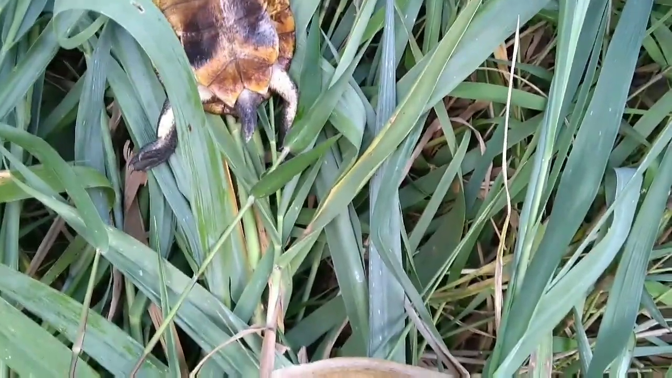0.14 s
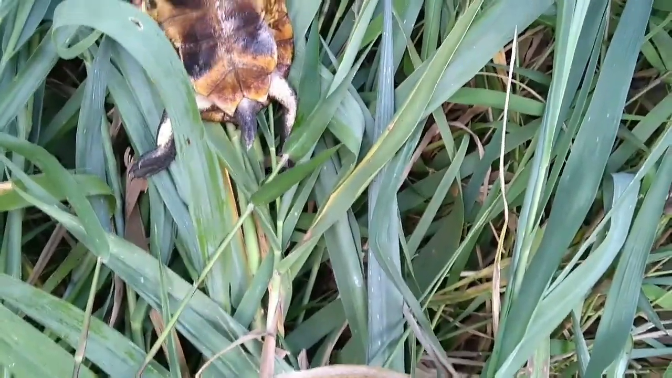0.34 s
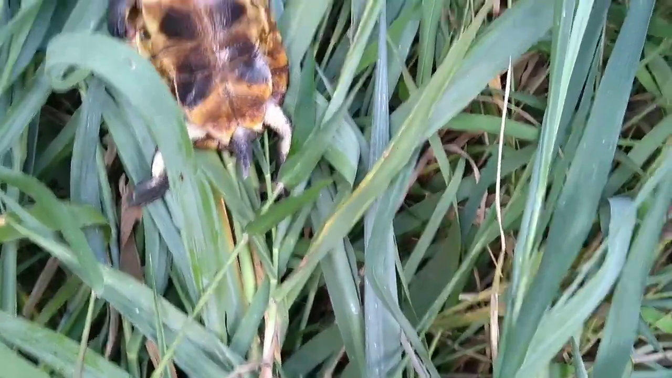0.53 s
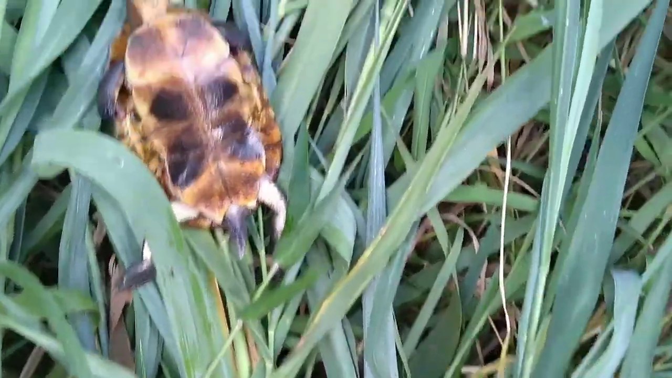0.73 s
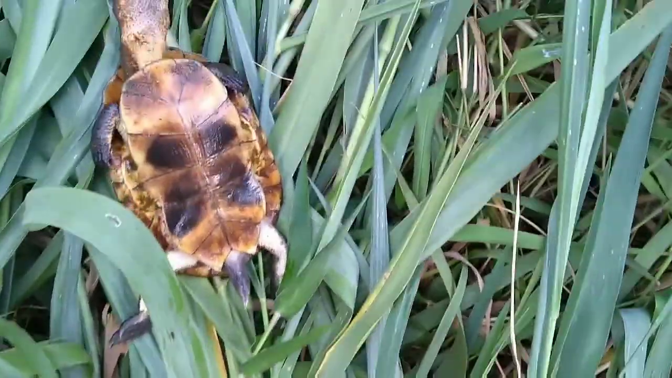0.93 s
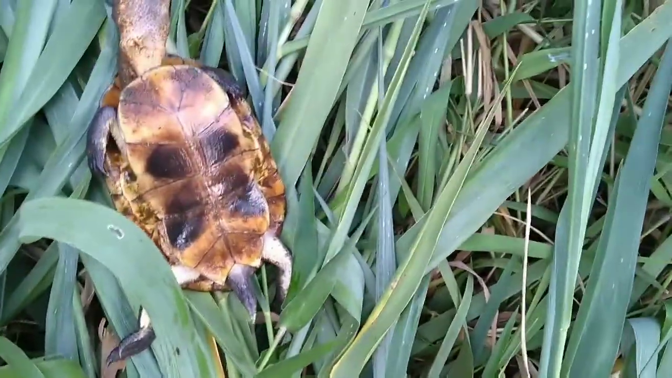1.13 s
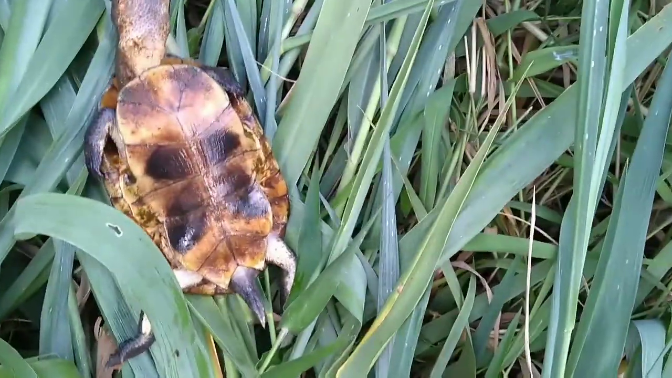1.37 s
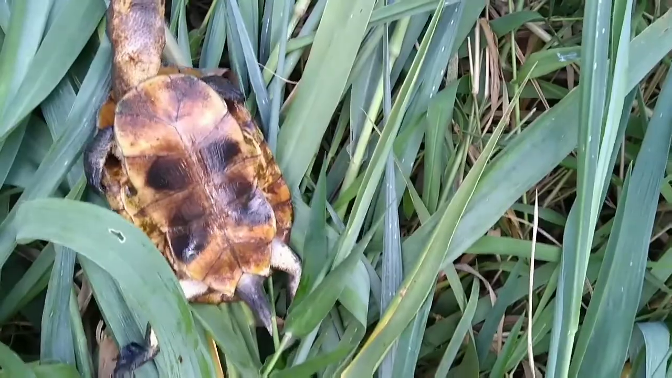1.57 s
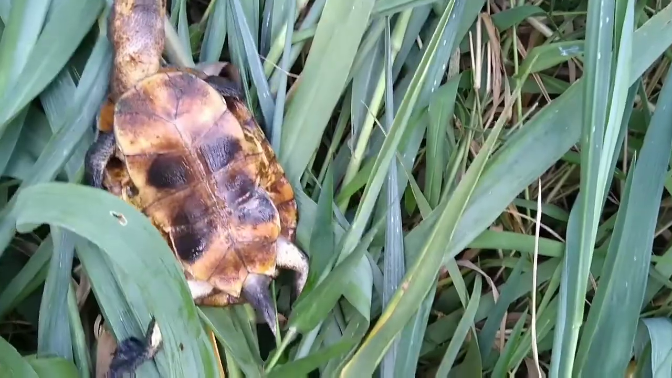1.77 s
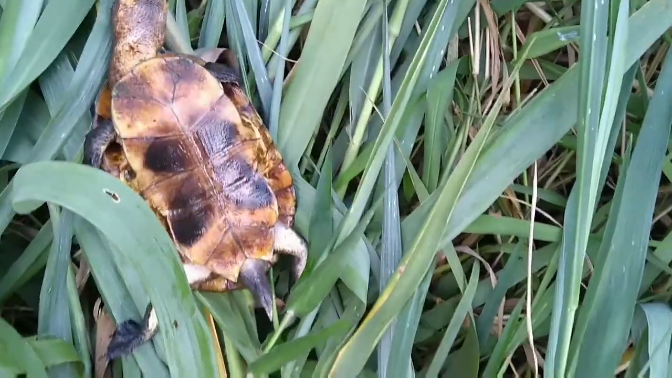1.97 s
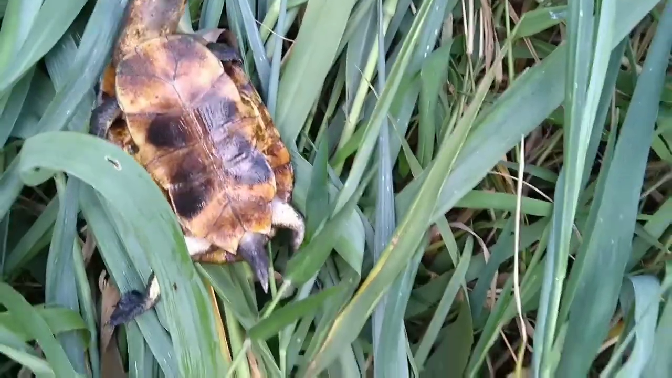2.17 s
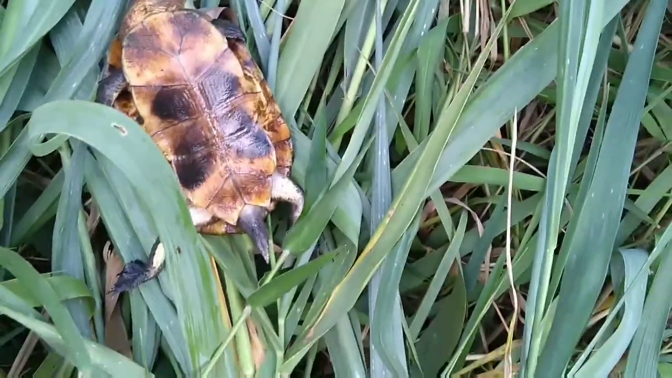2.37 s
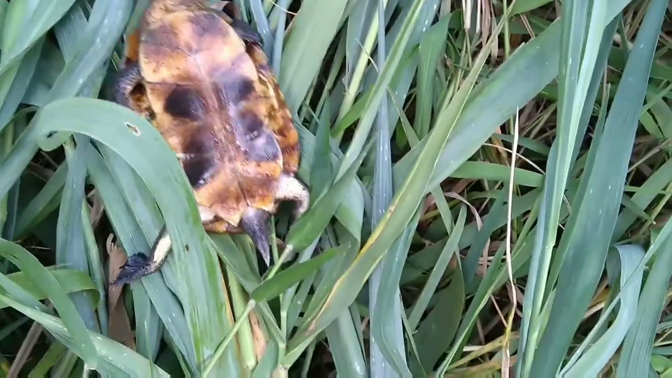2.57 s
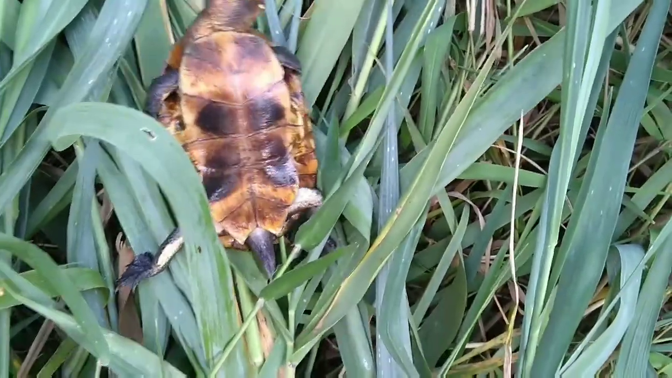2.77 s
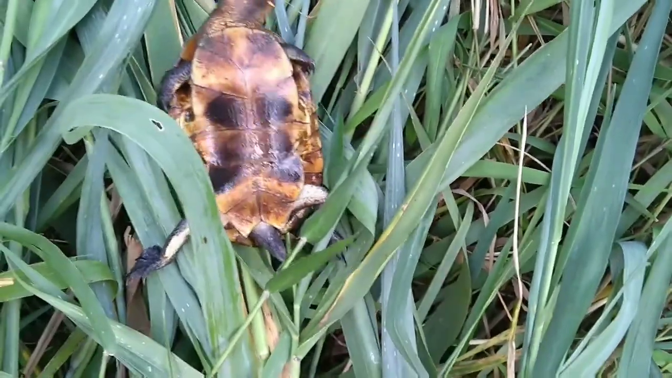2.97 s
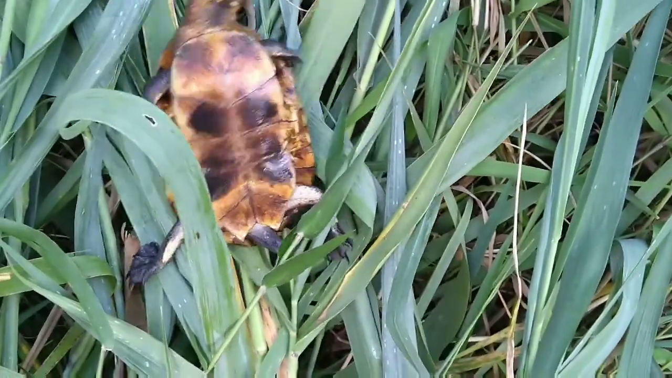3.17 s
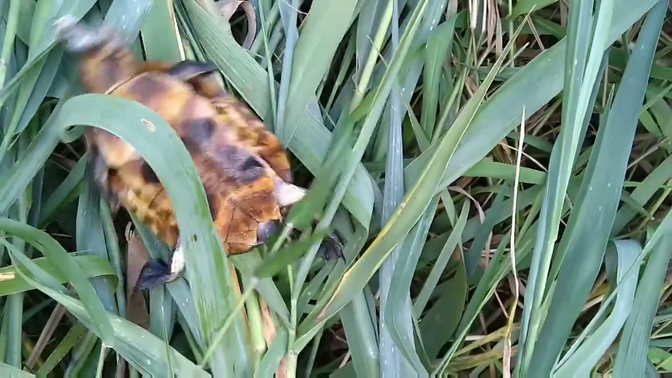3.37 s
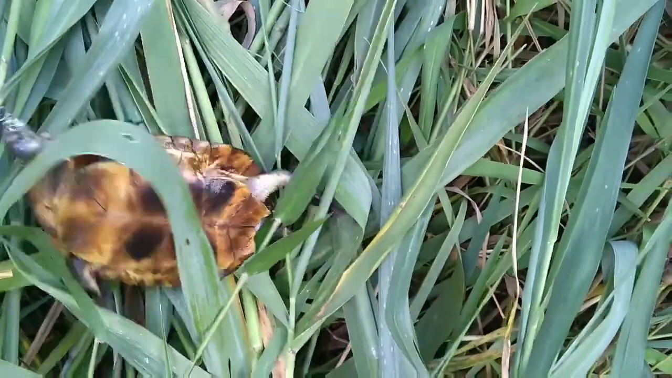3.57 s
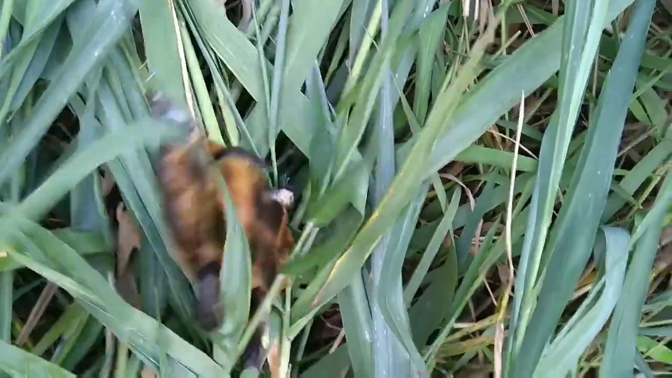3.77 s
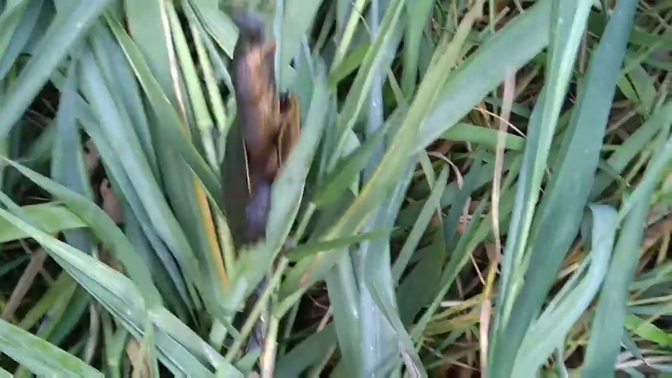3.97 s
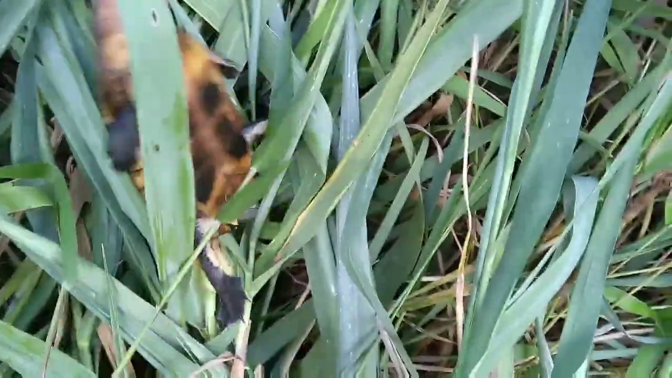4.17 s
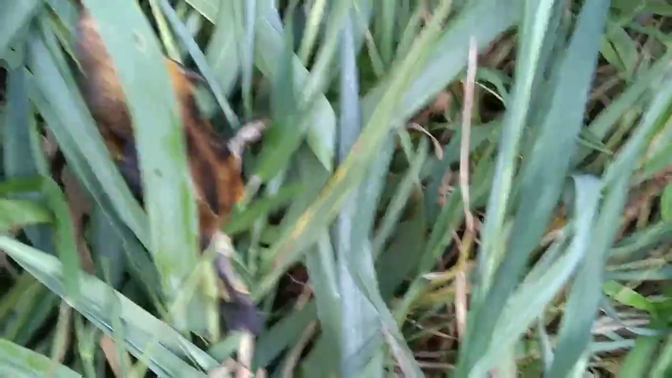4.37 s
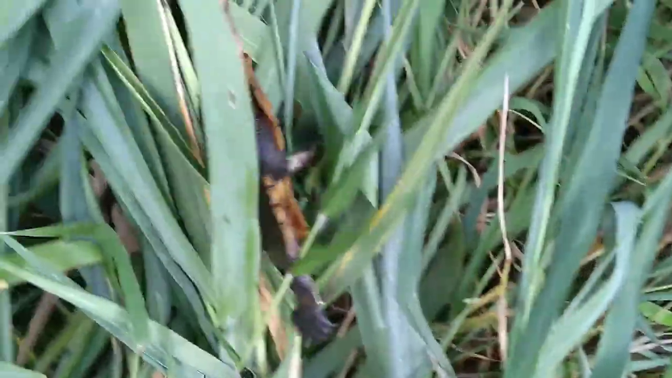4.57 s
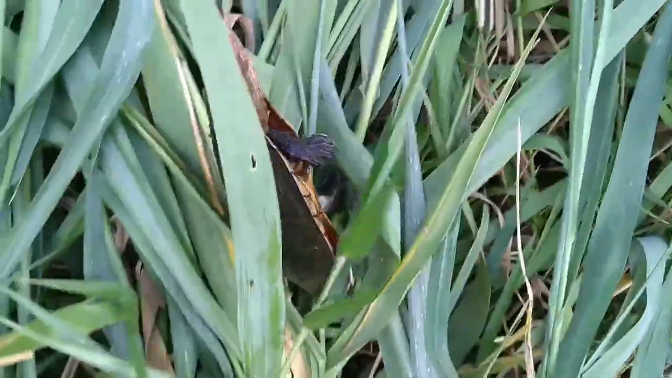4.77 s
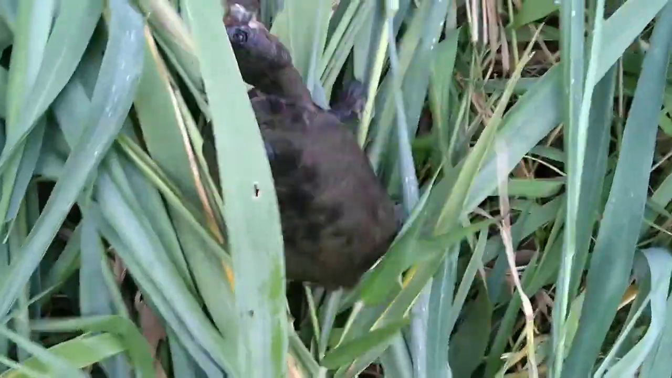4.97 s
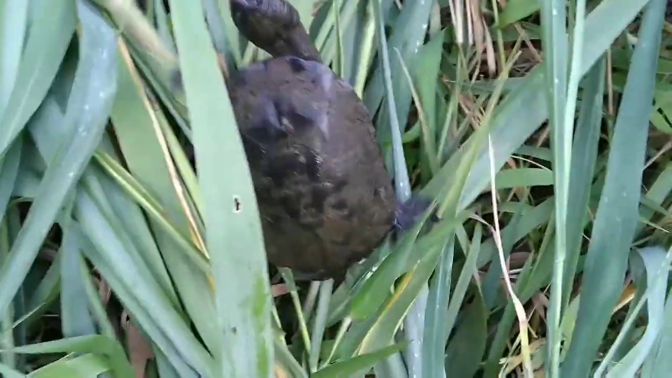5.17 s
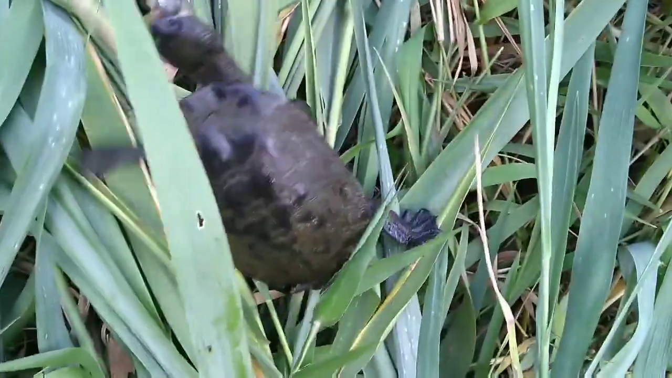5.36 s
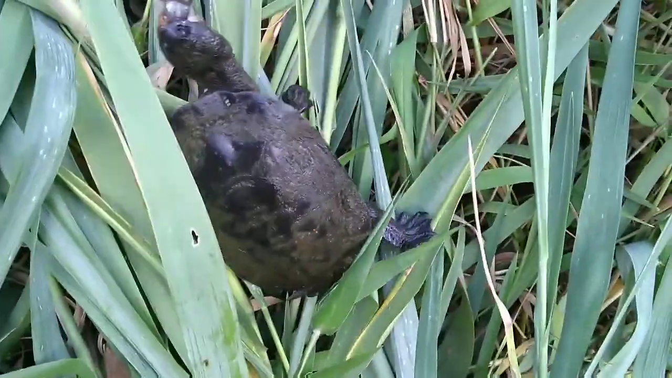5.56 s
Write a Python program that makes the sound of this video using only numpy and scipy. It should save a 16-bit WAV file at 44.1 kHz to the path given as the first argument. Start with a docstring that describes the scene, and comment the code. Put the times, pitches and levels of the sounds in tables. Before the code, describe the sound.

A quiet grassy place with a continuous high insect trill and soft hiss. Faint hollow rubbing and sparse dry clicks come first, then a nearly still pause. Ticks gather, and about halfway the animal thrashes over, blades crunching and stems cracking across left and right. The rustling breaks into separate shoves, with dull handling thumps near the close, slightly gritty recorder microphone.

```python
"""Far-off insects throb around 6 kHz over soft air, while a grass stem rubs hollowly along a shell.
A tortoise on its back in tall grass then kicks, rolls over and drags itself through the blades.
Insects, rubs and crackle are noise and grains ringing resonances; snapping stems are short noise cracks.
The recorder is hand-held: low noise from the hand, a late nearer insect, and two ports steered to left and right.
A crude rate change at the end adds copies of every sound shifted 3900 Hz up and down."""
import sys
import numpy as np
from scipy import signal
from scipy.fft import rfft, irfft, next_fast_len
from scipy.io import wavfile

SR = 44100
rng = np.random.default_rng(int(sys.argv[2]) if len(sys.argv) > 2 else 0)


def master(y):
    """Save y as 16-bit WAV."""
    cut = np.clip(np.atleast_2d(y).T, -1, 1)
    pcm = np.round(cut * 32767)  # scale
    wavfile.write(sys.argv[1], SR, pcm.astype(np.int16))


N = 247709


def from_db(db):
    """Decibels to gain."""
    return 10 ** (np.asarray(db) / 20)


def power_sum(db):
    """Add levels in dB as powers along the first axis."""
    return 10 * np.log10(np.sum(from_db(db) ** 2, axis=0))


def rms_one(x):
    """Scale to unit rms."""
    return x / np.sqrt(np.mean(x ** 2) + 1e-20)


def in_time(rows):
    """Columns of a curve table, one value a sample."""
    s, *columns = np.transpose(rows)
    return [np.interp(np.arange(N) / SR, s, column) for column in columns]


def at_hz(points, hz):
    """Read a spectrum on a log-frequency axis."""
    points = np.array(points)
    return np.interp(np.log(hz), np.log(points[:, 0]), points[:, 1])


def drift(rate):
    """Slow random wander of unit rms, drawn every 20 samples; a higher rate in Hz wanders faster."""
    r = np.exp(-40 * np.pi * rate / SR)
    noise = rng.standard_normal(N // 20 + 2002)
    slow = signal.lfilter([1], [1, -2 * r, r * r], noise)[2000:]   # drop the filter's start
    return np.interp(np.arange(N) / 20, np.arange(len(slow)), rms_one(slow))


def resonate(x, hz, width_hz):
    """Two-pole resonance with gain 1 on top."""
    r = np.exp(-np.pi * width_hz / SR)
    zeros = (1 - r * r) / 2 * np.array([1, 0, -1])
    poles = [1, -2 * r * np.cos(2 * np.pi * hz / SR), r * r]
    return signal.lfilter(zeros, poles, x + 1e-18)


def band(x, low_hz, high_hz, order=2):
    """Butterworth band-pass."""
    sos = signal.butter(order, [low_hz, high_hz], "band", fs=SR, output="sos")
    return signal.sosfilt(sos, x + 1e-18)


def one_pole(x, hz, kind="low"):
    """Gentle first-order low- or high-pass."""
    return signal.sosfilt(signal.butter(1, hz, kind, fs=SR, output="sos"), x)


def later(x, lag_s):
    """Delay by any fraction of a sample."""
    size = next_fast_len(N)
    turn = np.exp(-2j * np.pi * np.fft.rfftfreq(size, 1 / SR) * lag_s)
    return irfft(rfft(x, size) * turn, size)[..., :N]


def insects(depth_db, alike):
    """Each far singer's wing teeth rattle a narrow resonance in an uneven throb."""
    # far singers: pitch_hz, width_hz, level_db (relative), throb_per_s
    singers = [(5975, 46, 1.5, 31.), (5943, 113, -4, 24), (6150, 97, 1, 84), (6160, 530, -18.5, 87),
               (6324, 88, 2, 25), (6424, 33, 10, 41)]
    # loudness of the whole chorus: time_s, level_db (before the trim below)
    chorus = [(0.0, -51.5), (0.17, -50.5), (0.48, -53), (1.16, -53), (1.38, -47.5), (1.83, -49.5),
              (2.52, -49.5), (2.94, -49), (3.08, -54), (3.32, -50.5), (3.52, -44), (3.68, -51),
              (3.97, -48.5), (4.38, -48.5), (4.96, -49), (5.27, -44.5), (5.62, -49)]
    out = 0
    for hz, width_hz, level_db, throb_per_s in singers:
        throb_rate = throb_per_s * (1 + 0.1312 * drift(4.194))
        turns = np.cumsum(throb_rate) / SR + rng.random()
        gate = from_db(depth_db * np.cos(2 * np.pi * turns) + 3.94 * drift(1.4))
        near, own = rng.standard_normal((2, N))
        teeth = gate * np.array([near, alike * near + (1 - alike) * own])
        out = out + from_db(level_db) * rms_one(resonate(teeth, hz, width_hz))
    level = from_db(in_time(chorus)[0] - 10.5)
    return level * rms_one(band(out, 5913, 6259, order=3))


def air():
    """Far-off air and microphone hiss: steady coloured noise, unrelated at the two ports."""
    # colour of the air and hiss: frequency_hz, level_db (per Hz, relative)
    colour = [(20, 2), (45, -38), (80, 0.5), (150, 2), (300, -2.5), (700, -6), (1500, -12.5), (3000, -14.5),
              (6000, -16.5), (9000, -19.5), (16000, -19)]
    level_db = -73.5   # rms ahead of the recorder's steering
    hz = np.maximum(np.fft.rfftfreq(N, 1 / SR), 10)
    noise = irfft(rfft(rng.standard_normal((2, N))) * from_db(at_hz(colour, hz)), N)
    return from_db(level_db) * rms_one(noise)


def rubs():
    """Friction and uneven slips ring a steep resonance that glides as a stem slides, alike at both ports."""
    # single stems along the shell: start_s, length_s, first_pitch_hz, last_pitch_hz, level_db, roughness (0-1)
    strokes = [(0.0, 0.033, 1480, 1510, -63, 0.2), (0.043, 0.38, 1450, 1580, -60.5, 0.42),
               (1.427, 0.16, 1470, 1480, -65, .3), (1.581, 0.51, 1430, 1742, -59, 0.3),
               (2.722, 0.063, 880, 960, -69.5, 0.7), (2.778, 0.012, 1030, 1050, -57.5, 0.4),
               (2.801, 0.056, 1000, 975, -67, 0.9), (3.29, 0.016, 1520, 1530, -51, .8),
               (3.321, 0.021, 1510, 1460, -51.5, 0.7), (3.349, 0.15, 614, 710, -60.5, 0.57),
               (3.634, 0.08, 3450, 3400, -49, 0.43), (4.283, 0.0436, 680, 607, -52.5, 0.64),
               (4.677, 0.16, 1150, 987, -59, 0.87), (4.96, 0.038, 634, 626, -67, 0.4),
               (5.205, 0.042, 1230, 1210, -61, .8), (5.242, 0.089, 1144, 1133, -53, 0.48),
               (5.351, .03, 1155, 1170, -60, .8)]
    slips_per_s, width_share = 170, 0.086   # width as a share of the first pitch
    out, t = np.zeros(N), np.arange(N) / SR
    slips = rng.random(N) < slips_per_s / SR
    caught = rms_one(slips * from_db(3.3 * rng.standard_normal(N)))
    friction = rng.standard_normal(N) + 1j * rng.standard_normal(N)
    for start, length, from_hz, to_hz, level_db, rough in strokes:
        way = np.clip((t - start) / length, 0, 1)
        rough = np.clip(rough, 0, 1)
        r = np.exp(-np.pi * width_share * from_hz / SR)
        drive = friction * (1 - rough + rough * caught)
        swing = signal.lfilter([1], [1, -2 * r, r * r], drive)   # how hard the hollow rings
        turns = np.cumsum(from_hz + (to_hz - from_hz) * way) / SR
        tone = rms_one(np.real(swing * np.exp(2j * np.pi * turns)))
        out += from_db(level_db) * np.sin(np.pi * way ** 0.55) ** .5 * tone
    return out


def buffet():
    """Lumpy low noise from the hand on the recorder, mostly separate at the two ports."""
    # jolts of the hand: time_s, peak_level_db
    jolts = [(0.0, -75), (1.38, -68), (2.96, -68.5), (3.72, -57.5), (3.881, -76), (4.0, -66), (4.27, -60),
             (4.679, -69), (4.77, -58), (4.96, -69), (5.21, -76), (5.372, -72)]
    # steady rumble of the grip: time_s, level_db
    grip = [(0.0, -93), (1.5, -79), (2.6, -92), (3.3, -76), (4.3, -71.5), (5.62, -69)]
    fade_db_per_s = 298   # a jolt swells and fades alike
    s, jolt_db = np.transpose(jolts)[:, :, None]
    t = np.arange(N) / SR
    jolting_db = jolt_db - fade_db_per_s * np.abs(t - s)
    level_db = power_sum(np.vstack([jolting_db, in_time(grip)[0]]))
    lumps = from_db(2.6 * np.array([drift(6.5) for _ in range(3)]))
    common, *own = lumps * rng.standard_normal((3, N))
    return from_db(level_db) * rms_one(band(common + 3.9 * np.array(own), 73, 122, order=1))


def effort():
    """Level in dB of crackle, hollow, stems and tips: all moves over the resting rustle."""
    # kicks and shoves through the blades: start_s, length_s, crackle_db,
    # then re crackle: hollow_db (under the shell), stems_db, tips_db (dry tips)
    moves = [(1.164, 0.037, -64, 5, 1.5, -12), (1.3, 0.01, -56, -5, 0, 9),
             (1.356, 0.083, -59, -25, -25, -22), (1.585, 0.013, -68, 7, 13, -23),
             (1.683, 0.13, -66.5, -15, -25, -18), (2.022, 0.033, -64.5, -27, -22, 4),
             (2.448, .05, -69.5, -18, -21, -11), (2.635, 0.11, -64.5, -24, -32, -1),
             (2.717, 0.15, -57.5, -22, -25, -1), (2.867, 0.069, -66.5, -27, -24, 1),
             (2.998, 0.11, -59.5, -24, -32, 1.5), (3.246, 0.058, -57.5, -20, -25, -5),
             (3.346, 0.0086, -41.5, 2, -11, -14), (3.381, 0.018, -52, 0, -15, -16),
             (3.411, 0.026, -50, -3, -9, -13), (3.446, 0.037, -43, 4, -8, -15),
             (3.477, 0.069, -42.5, 7, -5, -2.5), (3.601, 0.065, -42.5, 4.5, -1.5, -7),
             (3.656, 0.13, -44, -30, -14, 0), (3.813, 0.073, -41.5, -12, -5, -2),
             (3.902, 0.047, -48.5, -7, -1.5, 2.5), (3.967, 0.16, -46.5, -13, -9, -4),
             (4.15, 0.13, -50, -31, -4.5, 0), (4.231, 0.06, -45.5, -3, -1, -5.5),
             (4.394, 0.38, -59.5, -28, -33, 1), (4.592, 0.035, -66, -25, -22, 1),
             (4.603, 0.095, -47, -35, -10.5, 4), (4.756, 0.011, -46, -39, 0.5, 0),
             (4.804, 0.024, -59.5, -20, -3, -1), (4.794, 0.21, -62, -17, -30, 0.5),
             (4.925, 0.12, -49.5, -18, -4, 1), (5.09, 0.15, -59, -22, -21, 2),
             (5.191, 0.061, -49.5, -36, -6, 0.5), (5.295, 0.054, -56, -27, 1.5, -11),
             (5.356, 0.041, -48, -28, -6.5, -9), (5.358, 0.056, -57, -25, -26, 5)]
    # the grass between moves: crackle_db, hollow_db, stems_db, tips_db
    rest_db = (-77.5, -100, -87, -80.5)
    rise_share, rise_db = 0.43, 11   # a move swells over its first part, holds, then dies away
    # fall rate of a move of the reference length; shorter moves die faster, longer ones slower
    fall_db_per_s, fall_ref_s, fall_law = 156, 0.072, 0.59
    start, length, crackle_db, *parts_db = np.transpose(moves)[:, :, None]
    t = np.arange(0, N, 40) / SR
    age, length = t - start, np.maximum(length, .005)
    rise = np.minimum(rise_db * (age / (rise_share * length) - 1), 0)
    fall = fall_db_per_s * (fall_ref_s / length) ** fall_law * np.maximum(age - length, 0)
    levels = []
    for part_db, still_db in zip([0, *parts_db], rest_db):
        moving_db = rise - fall + crackle_db + part_db
        level_db = power_sum(np.vstack([moving_db, still_db + 0 * t]))
        levels.append(np.interp(np.arange(N) / SR, t, level_db))
    return levels


def crackle(per_s, spread_db, clump_db, colour_db, patchy_db, hiss_share):
    """Blades slip past each other in clumped grains; each grain excites all blade sizes in its own mix."""
    # colour of the blades, each register re its own level: frequency_hz, level_db (before the trim below)
    blades = [(300, -43), (420, -33), (560, -6), (700, -15), (830, -28), (1080, -1), (1400, 3),
              (1800, -1.5), (2350, -6), (2800, 2), (3500, -5), (4400, 1), (6000, -2), (8000, -1),
              (11000, -8.5), (15500, -13)]
    # likeness of the grass at the two ports: frequency_hz, likeness (0-1)
    likeness = [(300, 0.85), (600, 1), (1100, 0.91), (1600, 0.17), (2500, 0.51), (4000, 0.3), (8000, 0),
                (15000, 0.9)]
    level_db, hollow_db, stems_db, tips_db = effort()
    clumps = from_db(clump_db * (0.55 * drift(18) + 0.9 * drift(90)))
    # harder effort rubs more blades at once
    rate = per_s * from_db(.4 * (level_db + 45)) * clumps
    at = np.flatnonzero(rng.random(N) < rate / SR)
    sizes = from_db(spread_db * np.minimum(rng.exponential(1, N), 5))[at]
    patches = [drift(15.4) for _ in range(7)]   # which blades are rubbing keeps changing
    out = np.zeros((2, N))
    for k, hz in enumerate(np.geomspace(320, 15000, 26)):
        shared, own = hiss_share * np.sqrt(clumps) * rng.standard_normal((2, N))
        strength = sizes * from_db(colour_db * rng.standard_normal(N)[at])
        signs = rng.choice([-1, 1], (2, N))[:, at]
        shared[at] += strength * signs[0]
        own[at] += strength * signs[1]
        alike = np.clip(at_hz(likeness, hz), 0, 1)
        second = alike * shared + np.sqrt(1 - alike ** 2) * own
        rung = resonate(np.array([shared, second]), hz, 0.11 * hz)
        if hz < 1500:   # hollow spaces ring with steeper flanks
            rung = resonate(rung, hz, 0.1 * hz)
        if hz < 800:
            register_db = hollow_db
        elif hz < 1500:
            register_db = stems_db
        elif hz > 6800:
            register_db = tips_db
        else:
            register_db = level_db
        blade_db = at_hz(blades, hz) + register_db + patchy_db * patches[k % 7] - 11.0
        out += from_db(blade_db) * rms_one(rung)
    return out


def ticks(count):
    """Small snaps at chance moments, as strong as the move they fall in; columns like the stems in snaps."""
    peak_re_crackle_db, low_db, bright_db, rattle_db = -1.5, -15, -10, -1   # parts re peak
    even = rng.random((count, 2))
    spread = 6 * rng.standard_normal((count, 4))   # dB
    at = (even[:, 0] * N).astype(int)
    peak_db = effort()[0][at] + peak_re_crackle_db + spread[:, 0]
    pitch_hz = 2800 + 2600 * even[:, 1]
    return np.transpose([at / SR, peak_db, pitch_hz, low_db + spread[:, 1], bright_db + spread[:, 2],
                         spread[:, 3], np.full(count, rattle_db)])


def snaps():
    """A snap is a short crack in three registers, followed by a rattle of the shaken blades."""
    # clearest snapping stems: start_s, peak_db (before the trim below), pitch_hz, low_db (re peak),
    # bright_db (re peak), pan_db (first port over second), rattle_db (re crack, before its shaping)
    stems = [(1.159, -35, 4900, -11, 7.5, 15, -26), (1.1728, -23, 4530, -7.5, -14, -13, -19.5),
             (1.3023, -24.5, 4960, -3, -13, 9, -11), (1.3258, -38, 3080, -16, -16, -1, -10),
             (1.372, -29, 3400, -34, -25, 5, 3), (1.3765, -35.5, 3460, -6, -25, 7, -13),
             (1.392, -40, 3600, -13, -20, 0, -18), (1.406, -43, 3800, -20, -20, -5, -16),
             (1.416, -45, 3700, -20, -20, 0, -16), (1.427, -33, 3630, -24, -16, -10, -3),
             (1.431, -35.5, 4900, -25, -17, -16, -12), (1.447, -39, 3600, -17, -16, 0, -11),
             (1.457, -46, 4020, -30, -14, 0, -17), (1.473, -41, 3600, -20, -20, -4, -16),
             (1.4852, -43.5, 5000, -5.5, -15, 2, -18), (1.5155, -43, 5100, -14, -7, 1, -13),
             (1.5958, -57, 2750, 21.5, -10, 9.5, 3), (1.6784, -47.5, 2920, -7, -27, 8, -14),
             (1.692, -44, 3050, -23, -27, -2, -11), (1.708, -48, 5170, -20, -25, 0, -18),
             (1.717, -37, 5060, -27, -29, -9, -17), (1.725, -39, 3180, -25, -24, -2, -13),
             (1.737, -45, 5100, -27, -25, -5, -16), (1.746, -53, 5270, -23, -25, 0, -14),
             (1.775, -39.5, 5000, -12, -12, -11, -5), (1.814, -38, 4960, -15, -22, -3, -7),
             (2.5107, -49.5, 3300, -8, -3, 11, -5), (2.5594, -50, 2820, -4, 3, 4, -5),
             (2.6993, -44, 4900, -28, -16, -9, -11), (2.7357, -36, 4200, -32, -4, -7, -12),
             (2.7826, -50, 2820, 10, -17, -11, -20), (2.8165, -32.5, 3110, -13, -10, -8, -1),
             (2.87, -39, 3840, -27, 1.5, 0, -21), (2.884, -30, 4000, -21, -16, -8, -27),
             (2.9003, -42, 5200, -17, -10, -7, -12), (2.9251, -37, 3860, -28, -17, -9, -2),
             (2.945, -34.5, 3820, -9.5, -8, -10, -9), (3.048, -22.5, 3730, -24, -10, -3, -16),
             (3.0914, -37.5, 3900, -30, -14, -7, -6), (3.1363, -32.5, 4480, -21, -10, 7, -20),
             (3.211, -39.5, 3640, -33, -18, 7, -12), (3.247, -44.5, 3470, -11, -5, 0, -15),
             (3.2823, -36.5, 3500, -38, -21, 7, -3), (3.2953, -27.5, 3580, -32, -22, 3, -17),
             (3.3265, -31, 3760, -30, -18, 0, -26), (3.3536, -16.5, 5400, -6, -14, -15.5, -32),
             (3.3588, -15, 5450, -21, -35, 13, -26), (3.3947, -37, 3500, 3, 3, -1, -6),
             (3.426, -30, 5300, -18, -22, -17.5, -5), (3.4545, -22.5, 5700, -14, -22, 11, -6),
             (3.460, -30, 5960, -20, -16, 10, -16), (3.4648, -20, 5800, -17, -20, -23, -27),
             (3.4743, -25.5, 5800, -8, -15, -21, -12), (3.4776, -21, 5900, -5.5, -18, 9, -20),
             (3.488, -27.5, 6000, -11, -23, 19, -21), (3.4948, -22, 5650, -18, -19, -12, -8),
             (3.4985, -23, 4940, -8, -23, 1, -8), (3.5603, -20, 3400, -3, -13, -2, 1),
             (3.6028, -21, 3480, -14, -12, 14.5, -19), (3.766, -30, 6000, -25, 6, -4, -18),
             (3.7864, -27, 5800, -29, -15, -18, -9), (3.7965, -24.5, 5770, -20, -15, 20.5, -23),
             (3.8257, -25.5, 5600, -22, -14, 7, -9), (3.8574, -24, 5600, -15, -15, -10, -19),
             (3.871, -33, 3520, -15, -16, 4, -15), (3.8993, -20, 2880, -12, -23, 11, -17),
             (3.9523, -32, 5370, -1, -2, 6, -30), (3.9872, -30, 3760, -8, 7.5, -3, 7),
             (4.045, -36, 5470, -19, -2, -2, -2), (4.0869, -23, 3970, -9.5, -17, 0, -7),
             (4.1305, -27.5, 5100, -29, -1.5, -6, -16), (4.2597, -20.5, 3140, -12.5, -5, -4.5, 3),
             (4.2788, -11.5, 6430, -16, -15, -10.5, -27), (4.3126, -39, 3260, -2, -12, 0, -11),
             (4.3455, -29.5, 3620, -20, -7, -7, -5), (4.3667, -29.5, 5330, -8, -18, 12, -12),
             (4.4062, -35, 5500, -28, -9, 4, -10), (4.593, -35, 4260, -31, -13, -13, 0),
             (4.601, -44, 3540, -23, -11, -2, -21), (4.6682, -28, 5700, -28, -24, -23, 1),
             (4.756, -44, 4000, -13, -4, -7, -11), (4.7727, -11, 3150, -12, -7, -5, -22),
             (4.9826, -24.5, 4900, -19, -6, -8, -14), (5.0399, -45, 3080, -32, -13, 3, -14),
             (5.2095, -38.5, 6300, -24, 4, -18, -8), (5.2455, -21.5, 3330, -26, -17, 0, -19),
             (5.295, -50, 4000, 2, -11, 4, -22), (5.343, -45, 3600, -10, -12, 5, -14),
             (5.3736, -28, 5760, -6.5, -22, 3, 3), (5.5872, -43, 5370, -11.5, 3, 8, 7)]
    rattle_s = 0.0051
    table = np.vstack([stems, ticks(count=50)])
    s, peak_db, pitch_hz, low_db, bright_db, pan_db, rattle_db = table.T
    age, out = np.arange(1600) / SR, np.zeros((2, N + 1600))
    tear = 1 - np.exp(-age / 0.00023)   # fibres tear over a moment
    draws = rng.standard_normal((len(s), 2, 1600)) * tear
    shake = np.exp(-age / rattle_s) * (1 - np.exp(-age / 0.00063)) * 1.38
    rattle = from_db(rattle_db)[:, None, None] * shake
    alike = draws[:, :1] + draws   # body and low part are partly alike at the ports
    sharp = alike * (np.exp(-age / 0.00029) + rattle)
    low = band(alike * (np.exp(-age / 0.0018) + rattle), 630, 2540, order=3)
    bright = band(draws * (np.exp(-age / 0.00015) + rattle), 6540, 10600, order=3)
    broad = band(sharp, 2180, 6000, order=2)
    for k, start in enumerate(np.round(s * SR).astype(int)):
        width_hz = .4 * pitch_hz[k]
        ring = resonate(resonate(sharp[k], pitch_hz[k], width_hz), pitch_hz[k], width_hz)
        body = 0.61 * broad[k] + ring   # the ring is the stem's own pitch
        parts = [(body, 0), (low[k], low_db[k]), (bright[k], bright_db[k])]
        crack = sum(from_db(db) * part / np.abs(part).max() for part, db in parts)
        port_db = peak_db[k] - 8.5 + np.array([[.5], [-.5]]) * pan_db[k]
        out[:, start:start + 1600] += crack * from_db(port_db)
    return out[:, :N]


def solo():
    """A nearer insect: a thin throbbing band below the chorus, silent until late."""
    # loudness of the near insect: time_s, level_db (before the trim below)
    song = [(5.37, -68), (5.472, -49), (5.482, -61), (5.594, -54), (5.617, -58)]
    s, level_db = np.transpose(song)[:, :]
    t = np.arange(N) / SR
    throb = from_db(1.3 * np.cos(2 * np.pi * 36.0 * (t - 5.465)))   # 36 a second
    level = np.interp(t, s, from_db(level_db - 8.0), left=0) * throb
    thin = resonate(resonate(rng.standard_normal((2, N)), 5530, 200), 5590, 200)
    return level * rms_one(thin)


def at_ports(pair):
    """The grass reaches the front port a little later and stronger, long waves most of all."""
    front_db, lag_s = 1.5, 0.0002405
    low_boost_db, low_hz = 2, 1630
    front = pair[0] + (from_db(low_boost_db) - 1) * one_pole(pair[0], low_hz)
    return np.array([from_db(front_db) * later(front, lag_s), pair[1]])


def scene():
    """Sound at the two ports."""
    rustle = crackle(per_s=2000., spread_db=3.5, clump_db=3.0, colour_db=1.5, patchy_db=4.0, hiss_share=0.37)
    grass = at_ports(rustle + snaps() + rubs())
    return grass + insects(depth_db=7.4, alike=0.091) + solo() + air() + buffet()


def record(dry):
    """Steer the ports, change the rate by taking the nearest sample, cut the top."""
    steer_lag_s, steer_share, steer_cut_hz = 0.0004084, 0.56, 4370
    right_treble_db = 4.5
    dry = dry + 2.29 * resonate(dry, 6315, 620)   # the port cavity rings: Hz, width in Hz
    # each side subtracts a delayed, dulled copy of the other port
    dull = one_pole(dry[::-1], steer_cut_hz)
    sides = dry - steer_share * later(dull, steer_lag_s)
    sides[1] += (from_db(right_treble_db) - 1) * one_pole(sides[1], 3000, "high")
    # 48 kHz to 44.1 kHz without interpolation: the timing error saws 3900 times a second
    fast = signal.resample_poly(sides, 160, 147, axis=1)
    nearest = np.round(np.arange(N) * 160 / 147).astype(int)
    picked = fast[:, np.minimum(nearest, fast.shape[1] - 1)]
    # 50 dB down from 16 kHz up
    return signal.sosfilt(signal.cheby2(14, 50, 16000, fs=SR, output="sos"), picked)


dry = scene()
out = record(dry)
master(out)
```